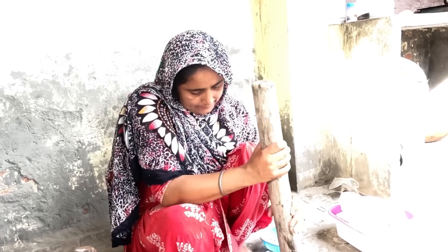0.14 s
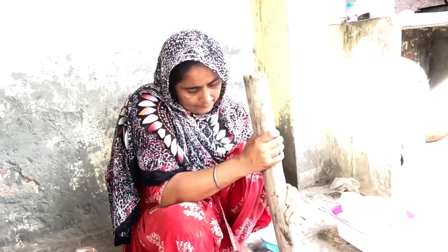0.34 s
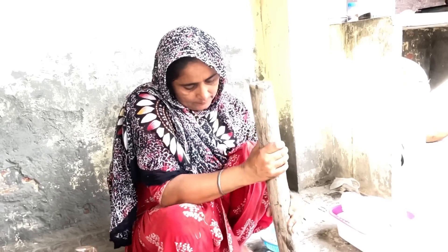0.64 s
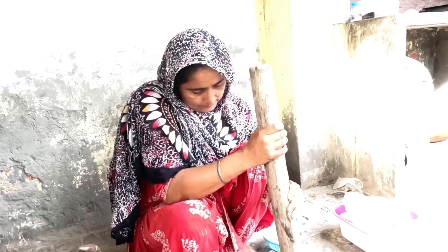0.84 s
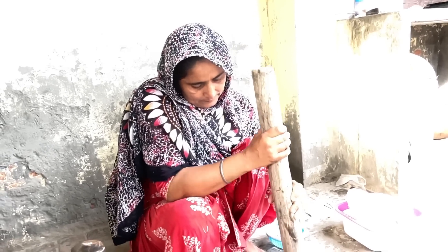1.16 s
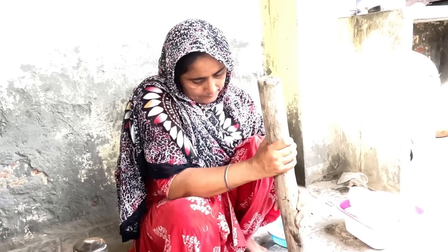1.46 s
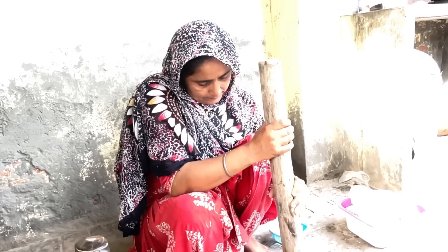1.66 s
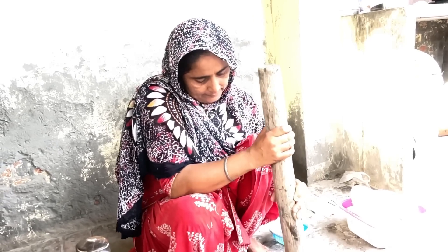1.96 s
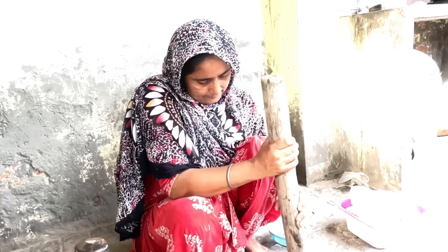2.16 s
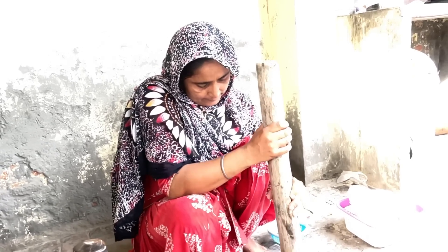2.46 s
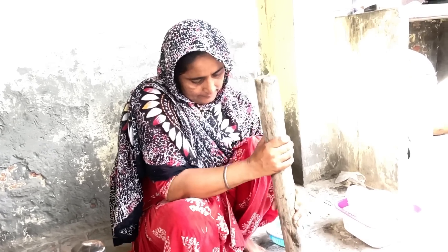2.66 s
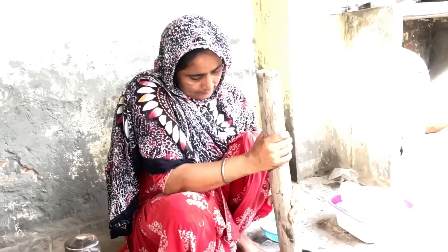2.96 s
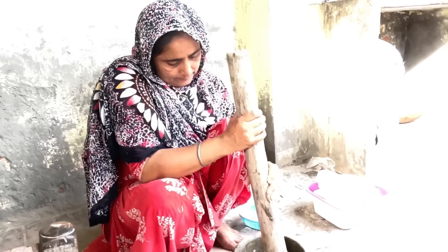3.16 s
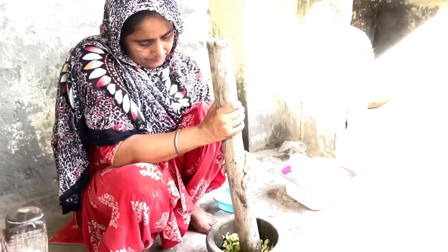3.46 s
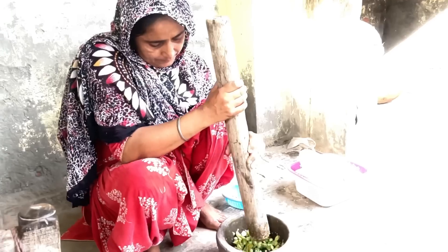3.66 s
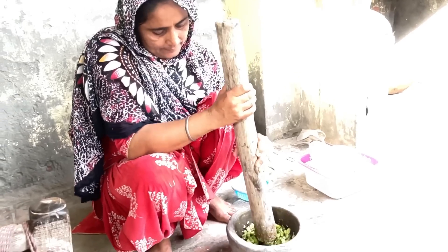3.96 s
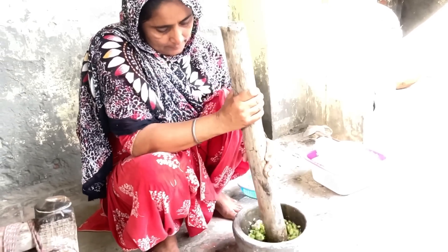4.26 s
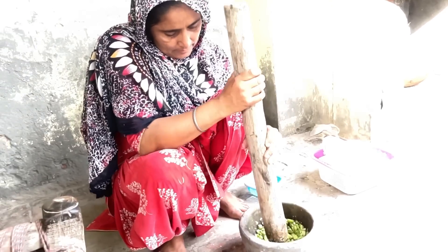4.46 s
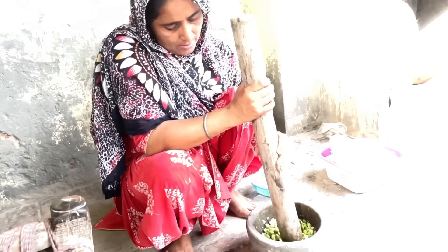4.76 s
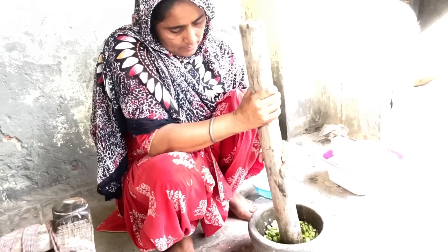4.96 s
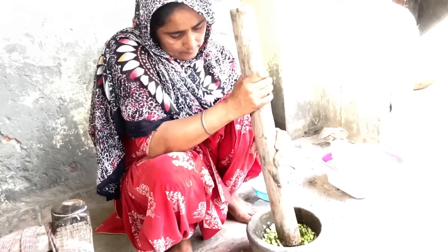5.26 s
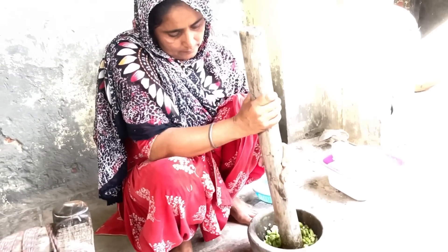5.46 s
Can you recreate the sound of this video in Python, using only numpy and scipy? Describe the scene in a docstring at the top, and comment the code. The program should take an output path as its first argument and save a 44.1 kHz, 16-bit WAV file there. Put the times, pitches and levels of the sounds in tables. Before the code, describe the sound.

Steady knocks of wood in a stone mortar, each with a moist crunch and low bumps as the bowl rocks on the ground.

```python
"""Village hum and wind on the microphone run throughout, in a walled courtyard.
From 0.1 s a long wooden pestle pounds green chillies in a stone mortar, about every 0.4 s.
Each blow crunches the pulp; the pestle rings, loudest where it knocks bare on the stone.
The mortar then thuds, rocks and bumps on the ground. Thin insect-like whistles come and go
from 0.55 s, and a far bird chirps at 0.9, 3.0 and 5.2 s."""
import sys
import numpy as np
from scipy import signal
from scipy.fft import rfft, irfft, next_fast_len
from scipy.io import wavfile
from scipy.ndimage import uniform_filter1d

SR = 44100
rng = np.random.default_rng(int(sys.argv[2]) if len(sys.argv) > 2 else 0)


def bounce(signal):
    """Save signal as a 16-bit WAV file at the path given by the first command-line argument."""
    frames = np.transpose(np.atleast_2d(signal))
    limited = np.clip(frames, -1, 1)
    pcm = np.round(limited * 32767).astype(np.int16)
    wavfile.write(sys.argv[1], SR, pcm)


N = 247401


def amp(db):
    return 10 ** (np.asarray(db) / 20)


def unit_rms(x):
    return x / np.sqrt(np.mean(x ** 2) + 1e-20)


def curve_at(points, hz):
    """Interpolates (Hz, value) points on a log-frequency axis."""
    point_hz, value = np.transpose(points)
    return np.interp(np.log(hz + 1), np.log(point_hz + 1), value)


def add(mix, start_s, sound):
    part = mix[max(round(start_s * SR), 0):][:len(sound)]
    part += sound[:len(part)]


def colour(x, spectrum_db):
    """Filters by (Hz, dB) points."""
    size = next_fast_len(len(x))
    gain = amp(curve_at(spectrum_db, np.fft.rfftfreq(size, 1 / SR)))
    return irfft(rfft(x, size) * gain, size)[:len(x)]


def fuzzy_tone(hz, width_hz):
    """Narrow noise carried on a per-sample pitch."""
    pole = [1, -np.exp(-np.pi * width_hz / SR)]
    real, imag = rng.standard_normal((len(hz), 2)).T
    flutter = signal.lfilter([1], np.convolve(pole, pole), real + 1j * imag)
    return unit_rms((np.exp(2j * np.pi * np.cumsum(hz) / SR) * flutter).real)


def ring(modes, rise_s, detune, phase=0., extra_db=0., t60_scale=1., lag_s_per_oct=0.):
    """Detuned modes swell and die. Bending waves carry high tones faster, so low modes can lag."""
    hz, db, t60_s = np.transpose(modes)[:, :, None]
    t = np.arange(SR // 6) / SR - rise_s - lag_s_per_oct * np.log2(hz.max() / hz)
    hz = hz * (1 + detune[:len(modes), None])
    level = amp(db + extra_db - 60 * np.maximum(t, 0) / (t60_scale * t60_s))
    swell = np.sin(np.pi / 2 * np.clip(1 + t / rise_s, 0, 1)) ** 2
    return (swell * level * np.cos(2 * np.pi * hz * t + phase)).sum(0) / amp(db).sum()


# Hum spectrum. Each row: frequency in Hz, relative density in dB.
HUM_SPECTRUM = [(65, -19), (110, -0.5), (181, 1.5), (332, -9), (700, -11), (1110, -11.5), (1900, -20),
                (2400, -25.5), (5200, -38), (5700, -40), (6800, -42), (7500, -47), (9500, -52),
                (11500, -45), (13300, -54), (14500, -90), (16000, -100)]
# Likeness of the hum at the two ports. Each row: frequency in Hz, coherence from 0 to 1.
HUM_COHERENCE = [(100, 1), (300, 0.83), (1000, 0.12), (4000, 0.074)]
# Hum phase between the ports. Each row: frequency in Hz, lead of the left in radians.
HUM_LEAD = [(100, 0.1), (700, 1.12), (1900, 3.1), (4000, 4.24)]

def village_hum(level_db=-39, patch_db=1.2):
    """Distant hum reaches two microphone ports; patches of its spectrum drift in level."""
    frames, hz = N // 512 + 5, np.fft.rfftfreq(2048, 1 / SR)
    left_re, left_im, own_re, own_im, patches = rng.standard_normal((frames, 1025, 5)).T
    patches = unit_rms(uniform_filter1d(uniform_filter1d(patches, 20, 0), 8, 1))
    coherence = np.clip(curve_at(HUM_COHERENCE, hz), -1, 1)[:, None]
    left = left_re + 1j * left_im
    right = coherence * left + np.sqrt(1 - coherence ** 2) * (own_re + 1j * own_im)
    right *= np.exp(-1j * curve_at(HUM_LEAD, hz))[:, None]
    gain = amp(curve_at(HUM_SPECTRUM, hz)[:, None] + patch_db * patches)
    _, hum = signal.istft(np.array([left * amp(1.), right]) * gain, nperseg=2048, noverlap=1536)
    return amp(level_db) * unit_rms(hum[:, :N])


# Rumble spectrum. Each row: frequency in Hz, relative density in dB.
WIND_SPECTRUM = [(20, -0.5), (45, 6.5), (65, 14), (90, 11), (120, -7), (200, -51), (400, -76.5)]
# Gust envelope. Each row: time in seconds, level in dB.
WIND_GUSTS = [(0.0, -47), (0.19, -37), (0.87, -45.5), (0.95, -37), (1.16, -43.5), (1.44, -35), (1.56, -50),
              (1.67, -26), (1.75, -42), (3.53, -44), (3.98, -37), (4.06, -42.5), (5.47, -39.5), (5.61, -55)]

def wind(lump_db=3, lump_s=0.028):
    """Wind on the microphone: a low lumpy rumble, part shared, part separate at each port."""
    *noises, lumps = rng.standard_normal((N, 4)).T
    both, left, right = (unit_rms(colour(noise, WIND_SPECTRUM)) for noise in noises)
    span = round(lump_s * SR)
    lumps = unit_rms(uniform_filter1d(uniform_filter1d(lumps, span), span))
    gust_db = np.interp(np.arange(N) / SR, *np.transpose(WIND_GUSTS))
    return amp(gust_db + lump_db * lumps) * (both + 1.06 * np.array([left, right]))


# Wet pulp spectrum. Each row: frequency in Hz, relative density in dB.
PULP_SPECTRUM = [(1000, -18.5), (1900, -9), (2400, -8), (3200, -10), (4600, -4.5), (5600, -3.5), (6700, -5),
                 (7500, -10.5), (9400, 0.5), (11800, -7.5), (13700, -15), (15200, -34), (16000, -44.5)]
# Sprays. Each row: start in seconds, level in dB, time to half level in seconds, tilt in dB/octave.
PULP_SPRAYS = [(0.1, -36, 0.063, -5.5), (0.514, -28, 0.031, -2), (0.914, -34.5, 0.044, -3),
               (1.32, -27.5, 0.041, -1.5), (1.724, -31, 0.038, -0.5), (2.131, -38.5, 0.039, -5),
               (2.155, -33, 0.029, 2.5), (2.5285, -31.5, 0.037, -0.5), (2.932, -30.5, 0.017, -3.5),
               (2.948, -38.5, 0.066, -1.5), (3.354, -33.5, 0.048, -4.5), (3.746, -35, 0.039, -2.5),
               (4.166, -35, 0.05, -5.5), (4.556, -37.5, 0.058, -3), (4.955, -36.5, 0.038, -4),
               (5.3514, -33.5, 0.031, -2.5)]

def pulp_spray(rise_s=0.0056):
    """Wet pulp sprays from under the pestle in clumps of tiny bursts that swell and die."""
    out, t = np.zeros(N), np.arange(SR // 4) / SR
    for start_s, db, half_s, tilt_db in PULP_SPRAYS:
        bursts = amp(4 * np.minimum(rng.exponential(1, len(t)), 5.5)) * rng.standard_normal(len(t))
        clumps = amp(3 * unit_rms(uniform_filter1d(rng.standard_normal(len(t)), 90)))
        spectrum = [(hz, level + tilt_db * np.log2(hz / 6000)) for hz, level in PULP_SPECTRUM]
        grains = colour(bursts * clumps, spectrum)
        grains /= 4 * grains.std()  # peaks near 1
        envelope = np.minimum(t / rise_s, 1) / (1 + (t / half_s) ** 2.74)
        add(out, start_s, amp(db) * grains * envelope)
    return out


# Skin cracks. Each row: time in seconds, level in dB, pitch in Hz, fizz in dB relative to the crack.
SKIN_CRACKS = [(0.5203, -34, 4160, -17), (0.9207, -44, 4360, -13), (1.326, -49, 2920, 7),
               (1.3281, -31, 4590, -16), (1.7305, -37, 3650, -2), (2.14, -37, 5760, -13),
               (2.16, -41.5, 3120, -2), (2.532, -38, 3540, -1), (2.557, -41, 4720, -3),
               (2.906, -41, 3940, -20), (2.942, -49, 3920, -16), (2.9534, -39, 4920, -1),
               (3.3056, -36, 3510, -20), (3.368, -35, 3660, -18), (3.4006, -34.5, 3650, -14),
               (3.76, -29, 4310, -30), (4.163, -38, 3690, -10), (4.168, -29, 4060, -23),
               (4.561, -39, 4810, -5), (4.9604, -30, 4820, -8), (5.355, -39, 5200, -2)]

def skin_cracks(crack_s=0.0058, samples=800):
    """Chilli skins crack: a short pitched noise burst with a bright fizz."""
    out = np.zeros(N)
    age = 3 * np.arange(samples) / SR / crack_s
    envelope = age * np.exp(1 - age)
    for time_s, db, hz, fizz_db in SKIN_CRACKS:
        crack = fuzzy_tone(np.full(samples, hz), width_hz=0.49 * hz)
        fizz = amp(fizz_db) * fuzzy_tone(np.full(samples, 12000), width_hz=3000)
        add(out, time_s - .001, amp(db) / 2 * (crack + fizz) * envelope)
    return out


# Bending modes of the pestle. Each row: frequency in Hz, relative level in dB, t60 in seconds.
PESTLE_MODES = [(450.7, 0.5, 0.26), (755, 2, 0.057), (1048, 3, 0.084), (1400, -4, 0.075), (1900, -5, 0.084),
                (1930, -24, .09), (2940, -30.5, 0.23), (2740, -28.5, 0.24), (3920, -62, 0.036),
                (4360, -56, 0.087)]
# Knocks on stone. Each row: start in seconds, level in dB, tilt in dB/octave,
# gain of the low modes in dB, factor on t60.
PESTLE_KNOCKS = [(0.1009, -8, -0.5, -10, 0.52), (0.1526, -32, -1, 1, 0.8), (0.5184, -29.5, 14, 7, 0.44),
                 (0.9214, -33.5, 1, 3, 0.7), (1.3267, -22, -1.5, -7, 0.54), (1.731, -2, -8, -15, 0.25),
                 (2.1614, -19, -4, 3, 0.4), (2.5333, 1.5, -3.5, -13.5, 0.23), (2.5514, -36, 17, -8, 0.57),
                 (2.9068, -23, -1.5, -3.5, 0.85), (2.9376, -37, 18, -4.5, 0.87), (3.3082, -9, 1.5, 1, 0.51),
                 (3.7609, -35, 4, 4, 0.8), (4.167, -35, 10.5, 4, 0.87), (4.563, -35, -1, 3, 0.92),
                 (4.9583, -35, -11, 4, 0.69), (5.356, -43, -3, -1, 0.66)]

def pestle():
    """The wooden pole rings in its bending modes; where it lands sets their balance."""
    out, hz = np.zeros(N), np.transpose(PESTLE_MODES)[0][:, None]
    for start_s, db, tilt_db, low_db, t60_scale in PESTLE_KNOCKS:
        jitter = rng.standard_normal(20)
        balance_db = tilt_db * np.log2(hz / 1000) + low_db * (hz < 900)
        knock = ring(PESTLE_MODES, rise_s=0.001726, detune=0.0078 * jitter,
                     phase=1.05 * jitter[10:, None], extra_db=balance_db, t60_scale=t60_scale)
        add(out, start_s, amp(db) * knock)
    return out


# Mortar on the ground: modes of the thud, the deep push and the hard edge.
# Each row: frequency in Hz, relative level in dB, t60 in seconds.
THUD_MODES = [(225.1, 6, 0.11), (299, 3, 0.072), (187, -7, 0.031), (401.8, -17.5, 0.39)]
PUSH_MODES = [(127, 10, 0.14), (84, -15.5, 0.26)]
EDGE_MODES = [(460, -10, 0.09), (483, 16.5, 0.034), (572, -5.5, 0.45), (726, 3, 0.14), (749.5, 12, 0.037),
              (956, 6, 0.13), (1234, -16.5, 0.18), (1402, -2.5, 0.039), (1977, -17, .012)]
# Bumps. Each row: peak time in seconds, thud level in dB, edge and push in dB relative to the thud.
MORTAR_BUMPS = [(0.131, -24, -12, -3), (0.167, -17, -30, -17), (0.2, -13, -5.5, -19),
                (0.231, -13.5, -3, -15), (0.309, -18.5, -27, -14), (0.336, -16.5, -34, -13),
                (0.453, -22.5, -32, -7), (0.528, -21.5, -23, -8), (0.54, -22.5, -30, -3),
                (0.567, -26, -28, -18), (0.6, -13.5, -4, -25), (0.627, -14.5, -29, -13.5),
                (0.681, -26, -31, -10), (0.698, -22, -29, -20), (0.731, -22.5, -40, -5.5),
                (0.929, -12.5, -13.5, -8.5), (0.943, -23, -12, 2.5), (0.962, -16, -16, -28),
                (1.001, -18, -3.5, -7), (1.027, -15.5, -13, -22), (1.078, -20.5, -13, -24),
                (1.102, -18.5, -17, -12), (1.335, -21.5, -10, -1), (1.356, -17.5, -10, -2),
                (1.396, -15.5, -15, -8), (1.416, -24.5, 4, -19), (1.425, -18.5, -3, -11),
                (1.502, -19.5, -30, -13), (1.528, -18, -22, -12.5), (1.74, -3.5, 1, -16.5),
                (1.773, -17, -25, -25), (1.811, -14.5, 2.5, -9), (1.838, -17, -39, -4.5),
                (1.92, -24, -14, -21), (1.942, -20, -13, -6), (2.146, -19.5, -7, -6),
                (2.169, -7.5, -1, -14.5), (2.207, -24, -13, -20), (2.237, -23.5, -2, -3),
                (2.542, -4.5, 3.5, -17.5), (2.592, -18, -15, -8.5), (2.617, -14, -27, -27),
                (2.635, -16.5, -21, -21), (2.687, -21, -20, -12), (2.741, -24.5, -31, 1.5),
                (2.949, -17.5, -31, -17), (2.961, -23, -10, 3), (3.008, -10.5, -13, -34),
                (3.041, -12, -9, -8), (3.13, -18, -16, -6.5), (3.154, -18, -10, -12),
                (3.263, -21.5, -26, -9), (3.312, -23.5, 3.5, -14), (3.389, -20.5, -12, -32),
                (3.423, -13, -8, -14.5), (3.448, -13, -24, -17), (3.515, -21, -15, -16),
                (3.778, -20.5, -27, -18), (3.797, -23.5, -28, -4), (3.815, -26, -19, 2),
                (3.827, -24, -28, 4), (4.172, -28, -21, -23), (4.181, -26.5, -28, -1.5),
                (4.569, -20, -18, -0.5), (4.656, -17.5, -10, -36), (4.672, -18, -28, -33),
                (4.783, -23, -29, -21), (4.969, -7.5, -12, -11.5), (5.042, -22.5, -14, -25),
                (5.057, -16.5, -33, -12), (5.097, -23.5, -20, -5.5), (5.365, -8.5, 2, -5.5),
                (5.385, -13, -28, -10), (5.438, -19, -33, -4), (5.463, -23, -10, -5),
                (5.552, -22, -18, -14)]

def mortar(thud_rise_s=0.0092, settle_push_db=-7.5):
    """The mortar bumps the ground: a hard edge, then thud and push, then a small settling bump."""
    thuds, edges = np.zeros(N), np.zeros(N)
    edge_octaves = np.log2(np.transpose(EDGE_MODES)[0][:, None] / 700)
    settling = [(peak_s + rng.normal(.04, .015), db / 2 + rng.normal(-20.5, 2.5), None, settle_push_db)
                for peak_s, db, _, _ in MORTAR_BUMPS]
    for peak_s, db, edge_db, push_db in MORTAR_BUMPS + settling:
        jitter = rng.standard_normal(30)
        thud = ring(THUD_MODES, thud_rise_s, detune=0.018 * jitter, phase=np.pi / 2)
        push = ring(PUSH_MODES, rise_s=0.0082, detune=0.035 * jitter[4:], phase=np.pi / 2)
        add(thuds, peak_s - thud_rise_s, amp(db) * thud)
        add(thuds, peak_s - .008, amp(db + push_db) * push)
        if edge_db is None:
            continue
        # A hard contact is short, so its edge starts faster and brighter.
        softness = np.clip(-(db + edge_db + 5) / 25, 0, 1)
        rise_s, tilt_db = 0.00097 + 0.0042 * softness, 2.5 - 9.9 * softness
        t60_scale = .45 + .7 * softness  # the pestle pressing down damps the stone
        edge = ring(EDGE_MODES, rise_s, detune=0.027 * jitter[8:], phase=0.18 * jitter[20:29, None],
                    extra_db=tilt_db * edge_octaves, t60_scale=t60_scale, lag_s_per_oct=0.002066)
        add(edges, peak_s - .0068 - rise_s, amp(db + edge_db) * edge)
    return thuds, edges


# Whistles. Each row: start in seconds, length in seconds, pitch in Hz, width in Hz, level in dB.
THIN_WHISTLES = [(.55, 0.078, 6220, 500, -58.5), (3.49, 0.09, 5000, 600, -58), (4.801, 0.3, 6260, 600, -62)]

def whistles():
    """Faint insect-like whistles swell and fade on a steady pitch."""
    out = np.zeros(N)
    for start_s, length_s, hz, width_hz, db in THIN_WHISTLES:
        samples = round(length_s * SR)
        add(out, start_s, amp(db) * fuzzy_tone(np.full(samples, hz), width_hz) * np.hanning(samples))
    return out


# Chirps. Each row: start in seconds, length in seconds, first pitch in Hz,
# time constant of the fall in seconds, level in dB.
BIRD_CHIRPS = [(0.886, 0.19, 5000, .05, -52.5), (2.993, .155, 5520, 0.068, -50.5),
               (5.205, 0.125, 5740, .055, -46.5)]

def bird(rest_hz=2710, width_hz=300, fade_db=-4):
    """Each chirp fades as its pitch sinks towards a resting note."""
    out = np.zeros(N)
    for start_s, length_s, top_hz, fall_s, db in BIRD_CHIRPS:
        t = np.arange(0, length_s, 1 / SR)
        hz = rest_hz + (top_hz - rest_hz) * np.exp(-t / fall_s)
        envelope = amp(db + fade_db * t / length_s) * signal.windows.tukey(len(t), .15)
        add(out, start_s, envelope * fuzzy_tone(hz, width_hz))
    return out


def down_lanes(x, direct_db=-7, t60_s=0.63):
    """A far sound, smeared by echoes from the lanes."""
    t = np.arange(SR // 2) / SR
    tail = rng.standard_normal((len(t), 2)).T * amp(-60 * t / t60_s)
    echoes = signal.fftconvolve(x[None], tail / np.linalg.norm(tail[0]), axes=1)[:, :N]
    return amp(direct_db) * x + echoes


# Courtyard decay. Each row: frequency in Hz, t60 in seconds.
YARD_T60 = [(100, 0.37), (300, 0.63), (1000, 0.26), (4000, 0.15), (12000, 0.054)]

def in_yard(x, left_db, wet_db):
    """Panned direct sound plus sparse echoes off the mud walls, each band dying at its own rate."""
    taps = np.zeros((2, SR // 2))
    slots = np.arange(200, SR // 2 - 20, 20)
    arrivals = slots + rng.integers(0, 20, (2, len(slots)))
    np.put_along_axis(taps, arrivals, rng.choice([-1., 1.], arrivals.shape), 1)
    hz, t, bands = signal.stft(taps, SR, nperseg=256)
    _, tail = signal.istft(bands * amp(-60 * t / curve_at(YARD_T60, hz)[:, None]), SR, nperseg=256)
    echoes = signal.fftconvolve(x[None], tail / np.linalg.norm(tail[0]), axes=1)[:, :N]
    return x * amp([[left_db / 2], [-left_db / 2]]) + amp(wet_db) * echoes


def scene():
    thuds, edges = mortar()
    near = in_yard(thuds, left_db=-1.2, wet_db=-19) + in_yard(edges, left_db=.3, wet_db=-9)
    near += in_yard(pestle(), left_db=-3.5, wet_db=-8)
    near += in_yard(pulp_spray() + skin_cracks(), left_db=3.4, wet_db=-6)
    return near + down_lanes(bird() + whistles()) + village_hum() + wind()


# Treble common to both ports. Each row: frequency in Hz, gain of the left into the right.
PORT_SHARE = [(6000, .01), (8500, .3), (9500, .6), (11000, .4), (12700, .85)]
# Phase of the right port. Each row: frequency in Hz, lag in radians.
PORT_LAG = [(4500, 0), (5300, 2.), (6900, 5.7), (8500, 3.3), (9500, 3.1), (11200, 1.8), (12300, .9),
            (13500, 0)]

def record(dry, low_cut_hz=48, high_cut_hz=15800):
    """The ports share their treble; the microphone drops deep bass and limits the top."""
    size = next_fast_len(N + 4096)
    hz, (left, right) = np.fft.rfftfreq(size, 1 / SR), rfft(dry, size)
    share = np.clip(curve_at(PORT_SHARE, hz), 0, 1)
    right = (share * left + (1 - share ** 2) * right) * np.exp(-1j * curve_at(PORT_LAG, hz))
    highpass = signal.butter(4, low_cut_hz, "high", fs=SR, output="sos")
    lowpass = signal.firwin(511, high_cut_hz, window=("kaiser", 9), fs=SR)
    heard = signal.sosfilt(highpass, irfft([left, right], size)[:, :N])
    return signal.oaconvolve(heard, lowpass[None], "same")


dry = scene()
out = record(dry)
bounce(out)
```